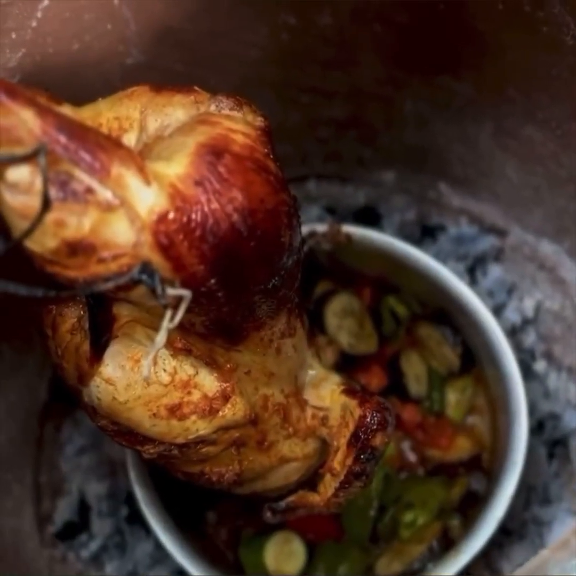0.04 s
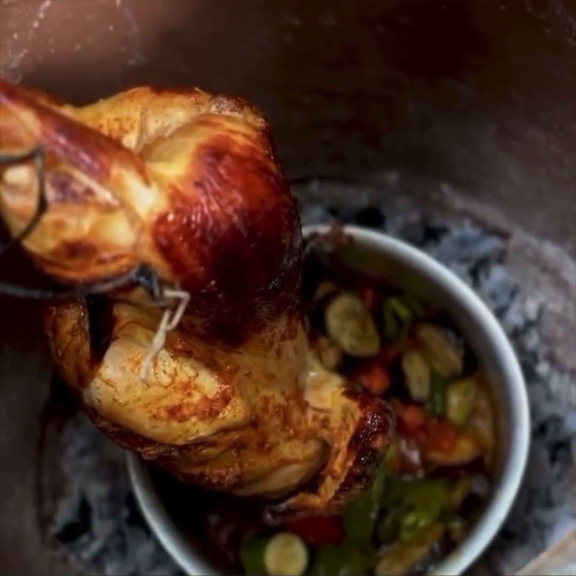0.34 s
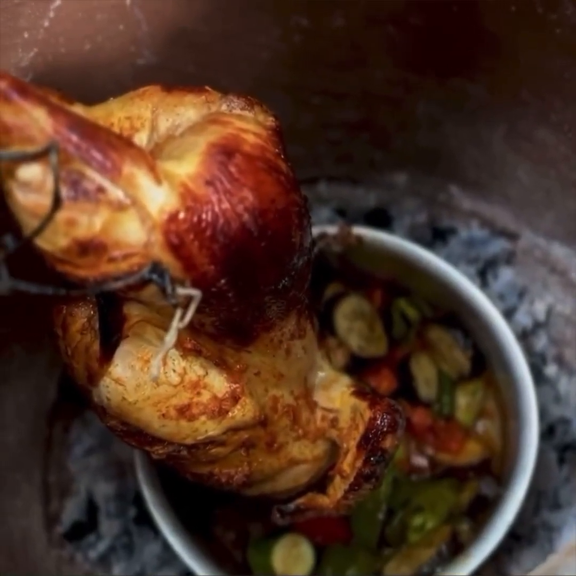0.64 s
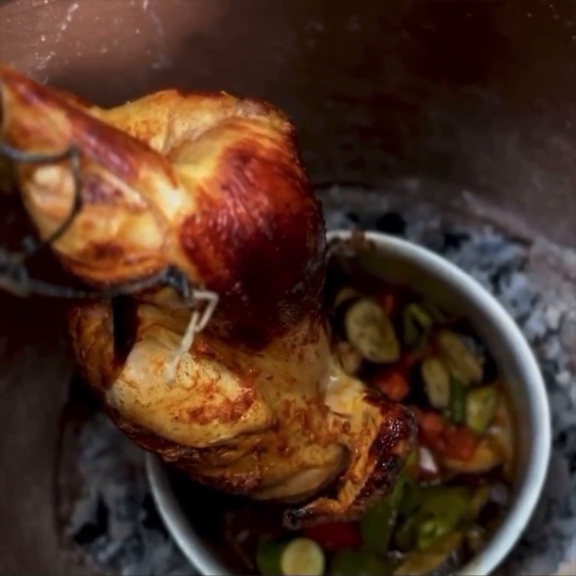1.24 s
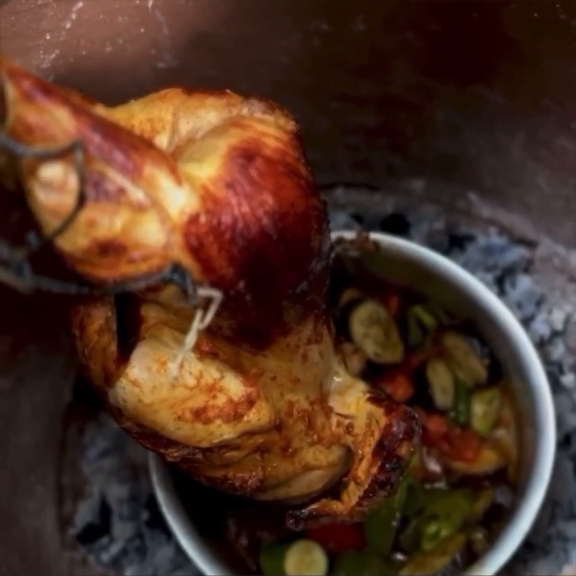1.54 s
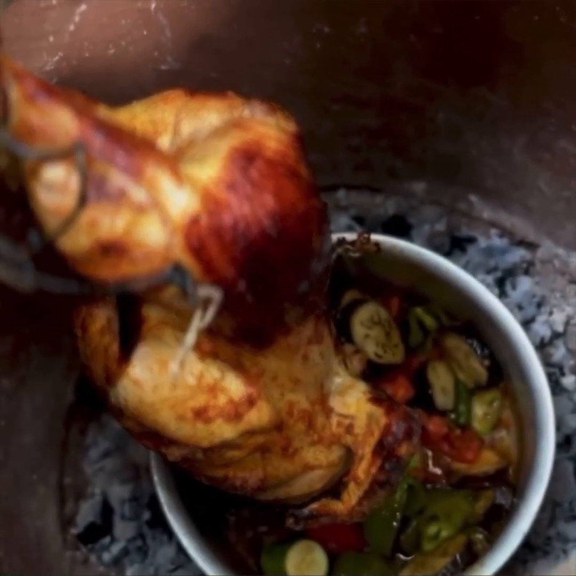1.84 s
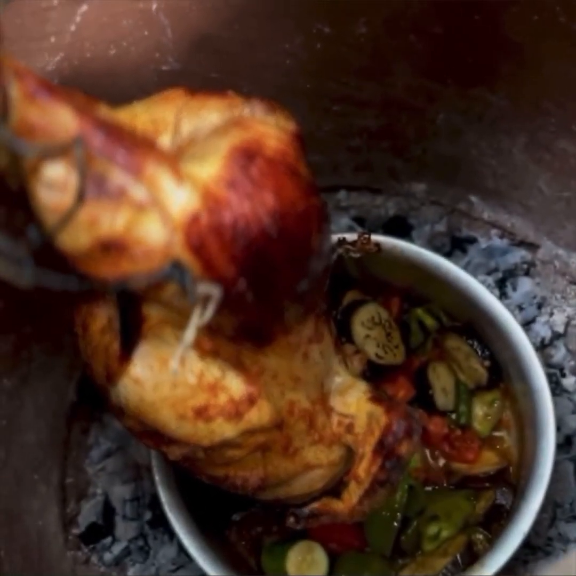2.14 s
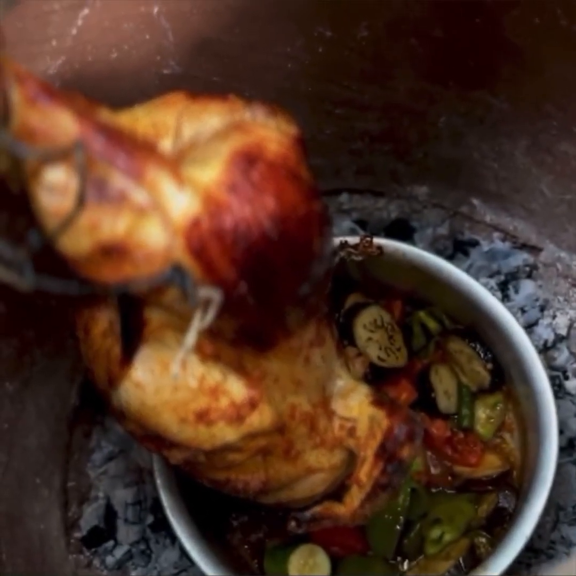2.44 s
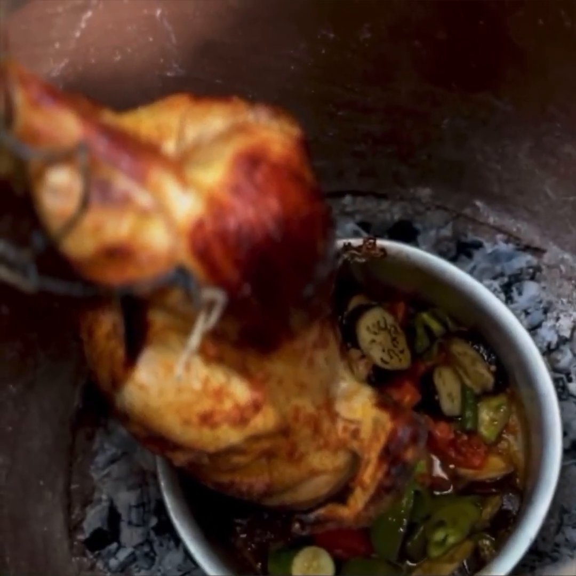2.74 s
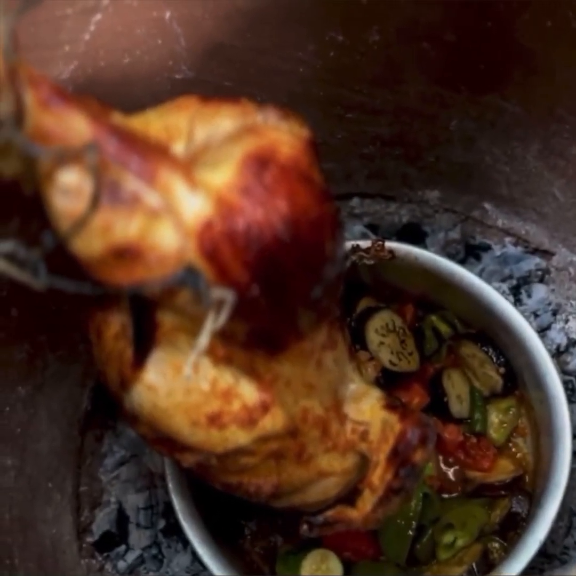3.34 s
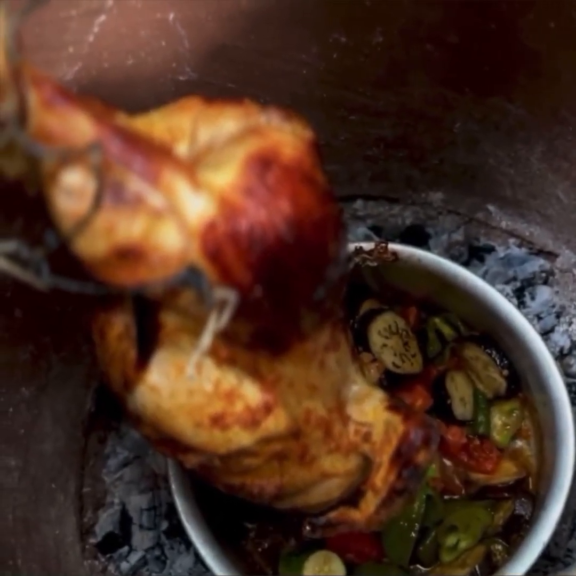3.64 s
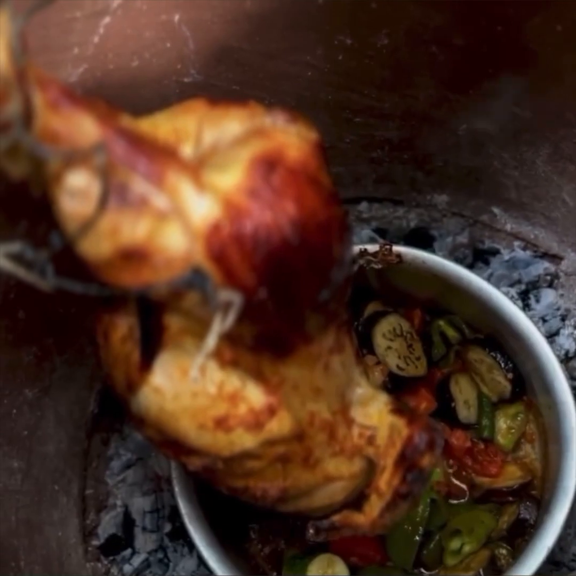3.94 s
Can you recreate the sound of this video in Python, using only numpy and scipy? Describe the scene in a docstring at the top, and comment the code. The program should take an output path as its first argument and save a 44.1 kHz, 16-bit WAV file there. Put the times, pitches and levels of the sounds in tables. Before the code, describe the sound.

Steady sizzling of chicken fat and steam, with hot air rumbling inside a deep oven.

```python
"""Chicken roasting in a deep oven

A pan of juices simmers on the coals under the chicken. Steam hisses in surges, four or five
a second, over a fine sizzle of bursting fat and a few spits. The draught rumbles and washes
through the oven's hollow; hot air thumps and brushes the microphone over a low hum."""
import sys
import numpy as np
from scipy import signal
from scipy.fft import rfft, irfft
from scipy.io import wavfile
from scipy.ndimage import uniform_filter1d

SR = 44100
rng = np.random.default_rng(int(sys.argv[2]) if len(sys.argv) > 2 else 0)


def to_wav(s):
    """Save 16-bit WAV."""
    ch = np.atleast_2d(s).T  # columns
    pcm = np.round(np.clip(ch, -1, 1) * 32767)  # PCM
    wavfile.write(sys.argv[1], SR, pcm.astype(np.int16))


N = 176400

# Steam surges: centre_s, length_s, gain_db
SURGES = [(.08, 0.22, 0), (0.253, 0.25, 0), (0.48, 0.21, -0.5), (0.679, .16, 2.5), (0.904, .19, 0),
          (1.125, 0.28, 0), (1.355, 0.24, -1), (1.56, 0.14, 3.5), (1.768, 0.23, -2), (1.953, 0.31, -4.5),
          (2.114, 0.34, -3.5), (2.31, .2, -1.5), (2.496, 0.16, -1), (2.714, 0.084, 0), (2.973, 0.18, 1.5),
          (3.178, 0.16, -2.5), (3.408, 0.11, 0.5), (3.628, 0.12, -3.5), (3.872, 0.18, 1)]
# Noise spectra: freq_hz, gain_db
STEAM_SPECTRUM = [(2000, -25), (4050, -29.5), (4300, -6.5), (4550, -3.5), (5230, 1), (5520, -7.5),
                  (6100, -15), (8000, -24.5), (16000, -50)]
FAT_SPECTRUM = [(1500, -34), (3000, -17.5), (4100, -21.5), (4700, 1), (5800, 1), (6900, 1), (8000, -0.4),
                (9300, -3.5), (10000, -7.5), (10300, -19), (12000, -11), (13000, -41), (16000, -45)]
SPRAY_SPECTRUM = [(6000, -32), (9500, -4), (10700, -3), (11200, 2), (11500, -1.5), (11950, -1.5),
                  (12200, -4), (12700, -8.5), (13100, -36), (13800, -27), (14500, -7.5), (15800, -13.5)]
SIMMER_SPECTRUM = [(1200, -30), (1700, -3), (1900, -8), (2060, -10.5), (2250, -2), (2420, -0.5),
                   (2530, -1.5), (2700, 1.5), (2950, -2.5), (3400, -3), (3950, -3.5), (5000, -17),
                   (9000, -35)]
DRAUGHT_SPECTRUM = [(15, -45), (28, -28), (42, -4.5), (55, 1), (85, -0.5), (108, -5.5), (160, -7.5),
                    (220, -10), (310, -17), (450, -25.5), (1000, -50)]
HOLLOW_SPECTRUM = [(150, -10.5), (280, -3.5), (400, -5.5), (480, -7), (700, -6.5), (790, -9), (880, 2.5),
                   (1000, -1), (1100, -6.5), (1260, -10), (1450, -5.5), (1660, -6), (1780, -12),
                   (2050, -19), (4000, -36)]
GUST_SPECTRUM = [(20, -25), (50, -2), (130, -0.5), (220, -3.5), (400, -14), (800, -36), (2000, -48)]
# Envelopes: time_s, gain_db
SPRAY_ENVELOPE = [(0.0, -43), (0.01, -34), (0.15, -44), (0.18, -37), (1.21, -38.5), (1.26, -32.5),
                  (1.64, -40), (1.69, -34.5), (2.06, -38), (2.18, -47), (2.44, -41), (2.48, -33.5),
                  (2.65, -39.5), (3.19, -37.5), (3.21, -43.5), (4.0, -38.5)]
SIMMER_ENVELOPE = [(0.0, -38.5), (0.13, -33), (0.15, -36), (0.3, -34.5), (0.33, -36.5), (0.99, -38),
                   (1.28, -36), (1.68, -38), (1.69, -34.5), (1.88, -38.5), (2.12, -37), (3.87, -38.5),
                   (3.93, -35), (4.0, -39.5)]
DRAUGHT_ENVELOPE = [(0, -33), (.35, -30.5), (.75, -32), (1.05, -29), (1.25, -31), (1.42, -36),
                    (1.52, -28.5), (1.7, -35), (1.87, -33), (2.03, -27), (2.15, -32), (2.45, -29.5),
                    (2.55, -26.5), (2.72, -27), (2.8, -32), (3.05, -34), (3.35, -26), (3.55, -29.5),
                    (3.85, -27), (4, -32.5)]
HOLLOW_ENVELOPE = [(0, -37), (.4, -37.5), (.7, -37), (1.6, -37.5), (2, -37.5), (3.7, -39), (4, -36)]
# Spits of fat: start_s, gain_db
SPITS = [(.663, -28), (2.746, -31), (3.3174, -17)]
# Hot-air puffs: centre_s, gain_db, pitch_hz, half_length_s
PUFFS = [(.910, -19.5, 71, .017), (1.515, -24, 65, .014), (2.666, -10.5, 80, .0075)]
# Gusts at the microphone: centre_s, length_s, stereo_swing, gain_db
GUSTS = [(0.083, .12, 0.68, -33), (0.22, 0.099, 0.4, -43), (.56, .13, 0.74, -39), (.68, 0.072, 0.6, -40),
         (.97, 0.19, 0.58, -36), (1.124, 0.084, 0.43, -30), (1.282, 0.15, 0.72, -35),
         (1.477, 0.084, 0.47, -32.5), (1.672, .14, 0.52, -34.5), (1.771, 0.081, .9, -31),
         (1.849, 0.061, 1, -32.5), (1.968, 0.16, 0.53, -47), (3.265, 0.039, 0.56, -40),
         (3.443, .04, 0.4, -34), (3.777, 0.15, 0.75, -36), (3.913, .14, 0.5, -37)]
# Stereo swing by band: freq_hz, weight
SWING_WEIGHT = [(80, 0.2), (170, 0.46), (330, 0.9), (550, 1.58), (900, 1.01), (1350, 1.03), (1750, 0.2),
                (2500, .15), (3000, 0.013)]
# Low resonances: centre_s, length_s, pitch_hz, half_width_hz, level_db, left_minus_right_db
GROANS = [(2.61, 0.45, 143, 6.7, -33, -1.5), (2.52, 0.24, 705, 22, -50.5, 3), (2.51, 0.14, 557, 40, -45, 1),
          (2.73, 2, 185, 2.9, -42, -2.5)]
# Likeness of the two microphone ports: freq_hz, coherence
PORT_COHERENCE = [(30, .98), (90, .99), (170, .98), (260, .93), (345, .78), (430, .62), (520, .5),
                  (750, .5), (860, .92), (1030, .94), (1250, .7), (1550, .86), (1850, .95), (2450, .92),
                  (2950, .25), (3350, .1), (3750, .88), (4050, .86), (4400, .27), (5300, .2), (6500, .64),
                  (9900, .56), (10600, .9), (11300, .28), (12100, .3), (13000, .8), (15500, .45)]
# Port phase: freq_hz, left_lead_rad
PORT_PHASE = [(170, 0), (430, -.2), (520, -.9), (690, -.9), (780, .4), (1400, .4), (1900, .1), (4000, 0),
              (5100, .4), (5650, -1.2), (9900, -1.2), (10250, 0), (16000, -.1)]
# Port balance: freq_hz, left_minus_right_db
PORT_BALANCE = [(80, -2), (170, -0.5), (340, -4), (520, -5), (800, -10), (1000, -8), (1380, -7), (1700, 0),
                (4100, 0.5), (4800, 0.5), (7000, 0.6), (12000, 0)]


def boiling(rest_db=-3, arch_power=0.93):
    """Boil strength, rms 1: a resting flow plus one arch per surge."""
    t, power = clock(), amp(rest_db) ** 2
    for centre_s, length_s, gain_db in SURGES:
        arch = np.maximum(1 - (2 * (t - centre_s) / length_s) ** 2, 0)
        power = power + (amp(gain_db) * arch ** arch_power) ** 2
    return unit(np.sqrt(power))


def pan_hiss(boil, steam_db=-27, fat_db=-25, fat_follow=0.36):
    """Steam follows the boil fully, frying fat in part; spray and juices drift on their own."""
    steam = amp(steam_db) * boil * noise(STEAM_SPECTRUM, patch_db=3.5)
    fat = amp(fat_db) * boil ** fat_follow * noise(FAT_SPECTRUM, patch_db=2.66)
    spray = envelope(SPRAY_ENVELOPE) * noise(SPRAY_SPECTRUM, patch_db=3, flicker_db=1.3, fft_size=1024)
    juices = envelope(SIMMER_ENVELOPE) * noise(SIMMER_SPECTRUM, patch_db=4)
    return steam + fat + amp(2.5) * (spray + juices)


def crackle(boil, base_rate_per_s=1300, level_db=-40, spread_db=0.5, pitches=24):
    """Tiny fat bubbles burst, each a few cycles long; the rate scales with the boil."""
    out, t = np.zeros((2, N)), np.arange(SR // 200) / SR
    for pitch_hz in np.geomspace(4500, 10000, pitches):
        onsets = rng.random(N) < boil * base_rate_per_s / pitches / SR
        strength = amp(spread_db * np.minimum(rng.exponential(1, N), 4))
        port_gain = rng.uniform(0.38, 1, (2, N))
        cycles = pitch_hz * t
        pop = cycles * np.exp(-cycles / 1.44) * np.sin(2 * np.pi * cycles)
        out += signal.oaconvolve(onsets * strength * port_gain, pop[None])[:, :N]
    return amp(level_db) * unit(out)


def spits(decay_s=0.003, highpass_hz=7500):
    """Larger drops of fat snap with a short bright tick."""
    t = clock()
    snaps = sum(amp(gain_db) * (t >= start_s) * np.exp(-abs(t - start_s) / decay_s)
                for start_s, gain_db in SPITS)
    highpass = signal.butter(2, highpass_hz, "high", fs=SR, output="sos")
    bright = signal.sosfilt(highpass, rng.standard_normal((3, N)))  # shared, left, right
    return snaps * unit(bright[0] + 0.5 * bright[1:]) / 2


def draught():
    """Air over the coals rumbles and washes through the oven's hollow."""
    rumble = noise(DRAUGHT_SPECTRUM, patch_db=1.6, flicker_db=2, fft_size=4096, patch_frames=14)
    wash = noise(HOLLOW_SPECTRUM, patch_db=1, flicker_db=0.93, fft_size=1024, patch_frames=14)
    return amp(-2) * envelope(DRAUGHT_ENVELOPE) * rumble + amp(1.5) * envelope(HOLLOW_ENVELOPE) * wash


def puffs():
    """Hot air thumps: a low sine under a brief bell curve."""
    out = np.zeros(N)
    for centre_s, gain_db, pitch_hz, half_length_s in PUFFS:
        tone = np.sin(2 * np.pi * pitch_hz * (clock() - centre_s))
        out -= amp(gain_db) * bell(centre_s, 2 * half_length_s) * tone
    return out


def drone(hum_hz=59.2, hum_db=-40.5):
    """Narrow low resonances swell and fade over a steady hum."""
    freq_hz = np.fft.rfftfreq(N, 1 / SR)
    out = amp(hum_db) * unit(np.sin(2 * np.pi * hum_hz * clock()))
    for centre_s, length_s, pitch_hz, half_width_hz, level_db, balance_db in GROANS:
        resonance = 1 / (1 + ((freq_hz - pitch_hz) / half_width_hz) ** 2)
        ring = unit(irfft(rfft(rng.standard_normal(N)) * resonance, N))
        port_gain = amp(level_db + balance_db * np.array([[0.5], [-0.5]]))
        out = out + port_gain * ring * bell(centre_s, length_s, power=4)
    return out


def gust_flutter(right_db=-7):
    """Gusts flutter at each microphone port independently."""
    force = sum(amp(gain_db) * bell(centre_s, length_s) for centre_s, length_s, _, gain_db in GUSTS)
    colour = amp(lookup(GUST_SPECTRUM, np.fft.rfftfreq(N, 1 / SR)))
    flutter = unit(irfft(rfft(rng.standard_normal((2, N))) * colour, N))
    return force * flutter * amp([[0], [right_db]])


def gust_swing(stereo, max_share=0.95):
    """Gusts widen the low midrange: left blends toward right and turns out of phase."""
    freq_hz, t, (left, right) = signal.stft(stereo, SR, nperseg=512, noverlap=384)
    gust = sum(swing * np.exp(-(2 * (t - centre_s) / length_s) ** 2)
               for centre_s, length_s, swing, _ in GUSTS)
    share = np.clip(lookup(SWING_WEIGHT, freq_hz)[:, None] * gust, 0, max_share)
    turned = ((1 - share) * left + share * right) * np.exp(-1j * np.pi * share)
    return signal.istft(np.array([turned, right]), nperseg=512, noverlap=384)[1][:, :N]


def noise(spectrum, patch_db, flicker_db=0.5, fft_size=2048, patch_frames=4):
    """Coloured noise at both ports, rms 1, with drifting spectral patches and broadband flicker."""
    frames, freq_hz = 4 * N // fft_size + 6, np.fft.rfftfreq(fft_size, 1 / SR)[:, None]
    left_re, left_im, other_re, other_im, patches = rng.standard_normal((frames, len(freq_hz), 5)).T
    patches = uniform_filter1d(patches, size=patch_frames, axis=0)
    patches = unit(uniform_filter1d(patches, size=12, axis=1))
    flicker = unit(uniform_filter1d(rng.standard_normal(frames), size=3))
    coherence = lookup(PORT_COHERENCE, freq_hz)
    left = left_re + 1j * left_im
    right = coherence * left + np.sqrt(1 - coherence ** 2) * (other_re + 1j * other_im)
    right *= np.exp(-1j * lookup(PORT_PHASE, freq_hz))
    balance_db = lookup(PORT_BALANCE, freq_hz)
    ports = np.array([left * amp(balance_db / 2), right * amp(-balance_db / 2)])
    ports *= amp(lookup(spectrum, freq_hz) + patch_db * patches + flicker_db * flicker)
    return unit(signal.istft(ports, nperseg=fft_size, noverlap=3 * fft_size // 4)[1][:, :N])


def envelope(points):
    """Gain per sample from time_s, gain_db points."""
    return amp(np.interp(clock(), *np.transpose(points)))


def bell(centre_s, length_s, power=2):
    """Smooth swell, length_s wide at 1/e."""
    return np.exp(-(2 * (clock() - centre_s) / length_s) ** power)


def lookup(points, freq_hz):
    """Table value on a log-frequency axis."""
    knots_hz, values = np.transpose(points)
    return np.interp(np.log(freq_hz + 1), np.log(knots_hz + 1), values)


def amp(db):
    """Decibels to gain."""
    return 10 ** (np.asarray(db) / 20)


def unit(x):
    """Scale to rms 1."""
    return x / np.sqrt(np.mean(x ** 2) + 1e-20)


def clock():
    """Sample times in s."""
    return np.arange(N) / SR


def scene():
    """Pan, oven air and gusts, summed in stereo."""
    boil = boiling()
    return pan_hiss(boil) + crackle(boil) + spits() + draught() + puffs() + drone() + gust_flutter()


def record(dry):
    """Stereo swing in the gusts, then a low-pass."""
    cutoff_hz = 15750
    lowpass = signal.firwin(511, cutoff_hz, window=("kaiser", 9), fs=SR)
    return signal.oaconvolve(gust_swing(dry), lowpass[None], "same")


dry = scene()
out = record(dry)
to_wav(out)
```